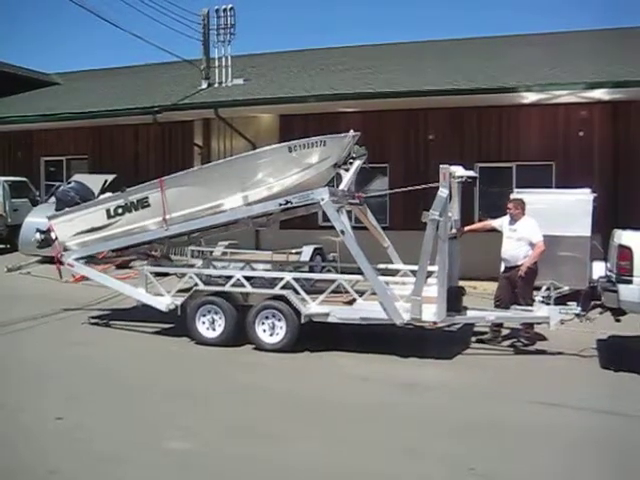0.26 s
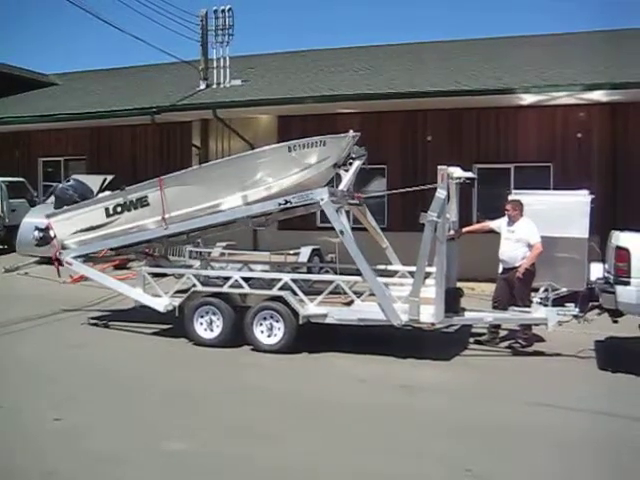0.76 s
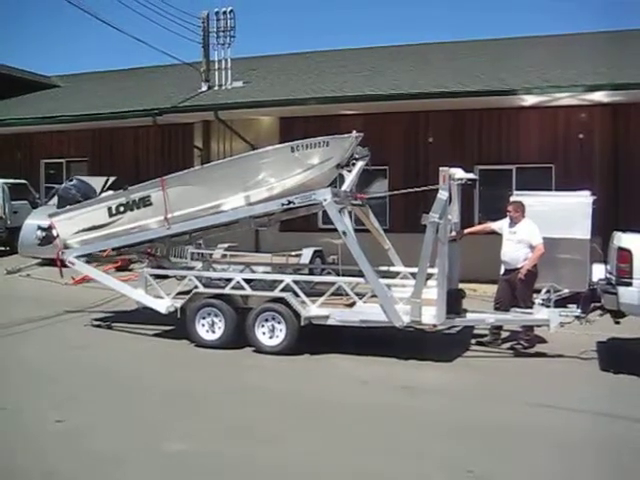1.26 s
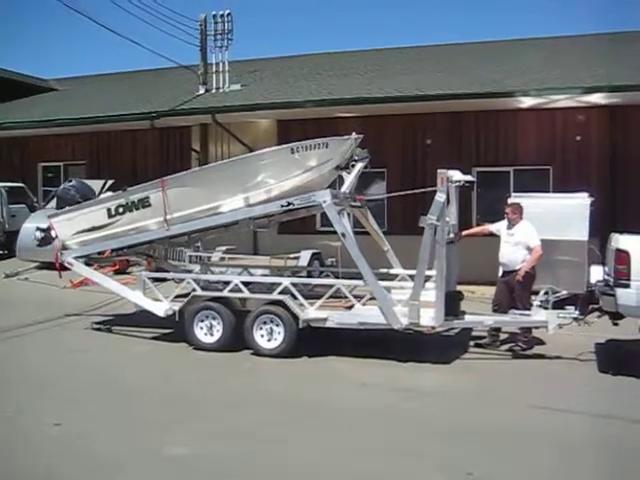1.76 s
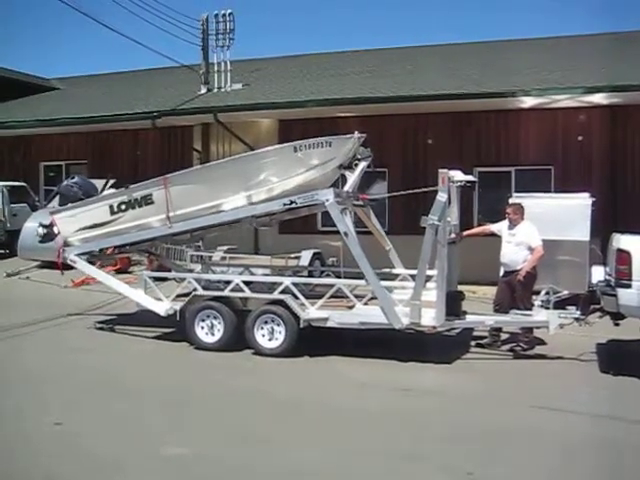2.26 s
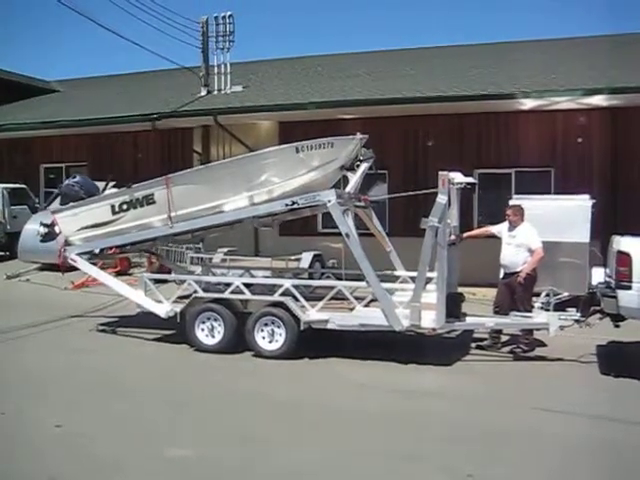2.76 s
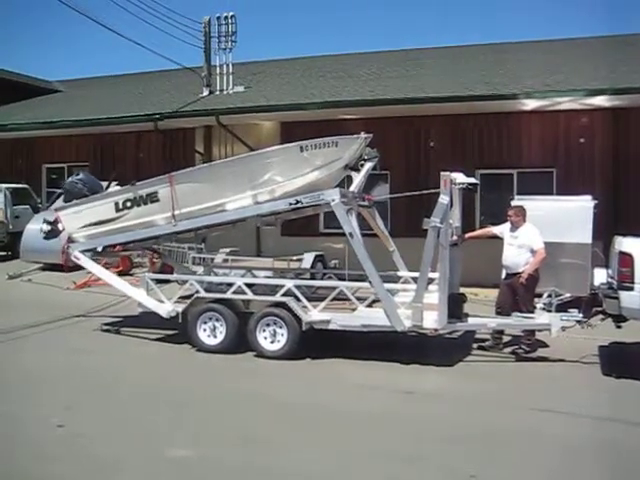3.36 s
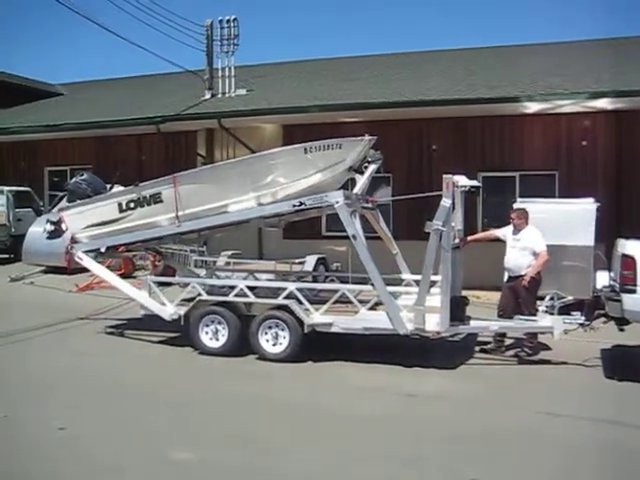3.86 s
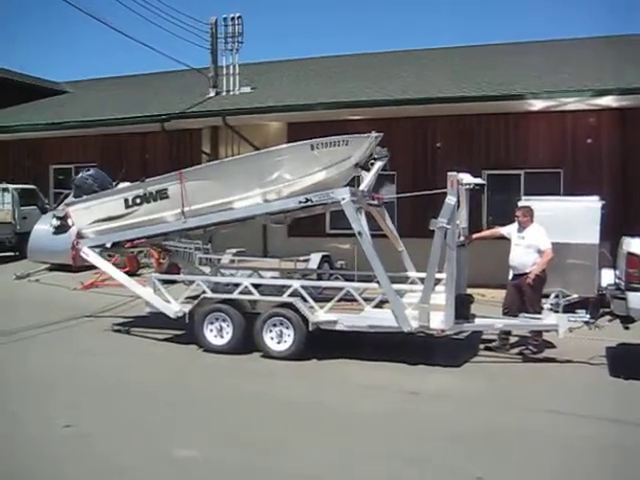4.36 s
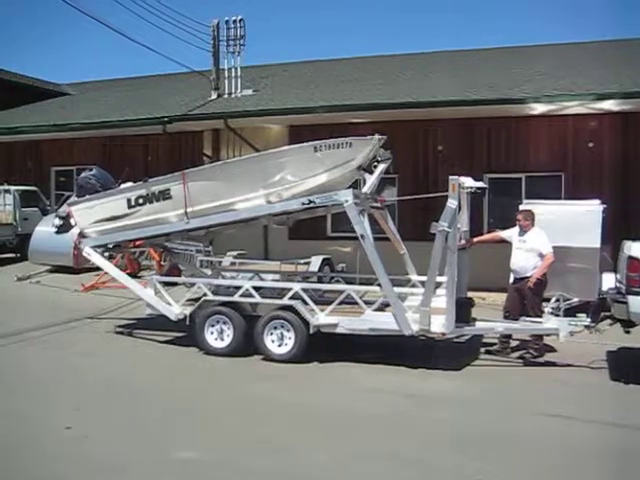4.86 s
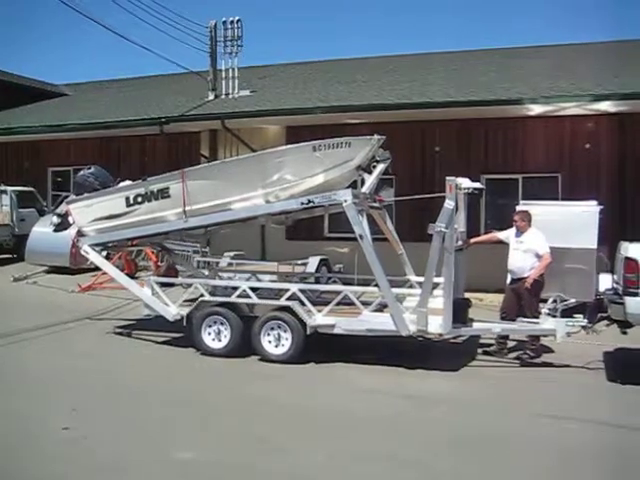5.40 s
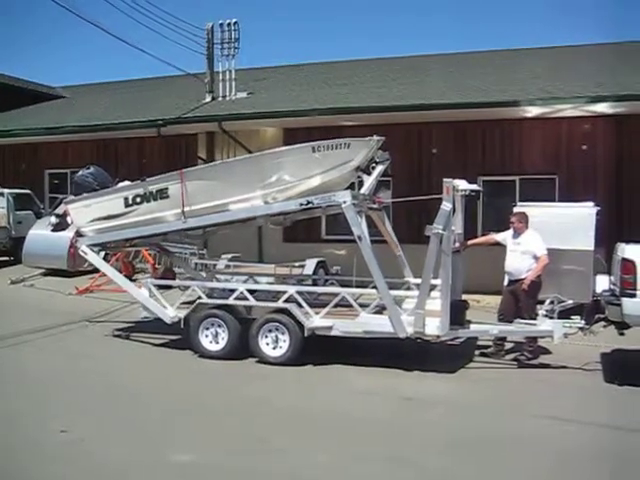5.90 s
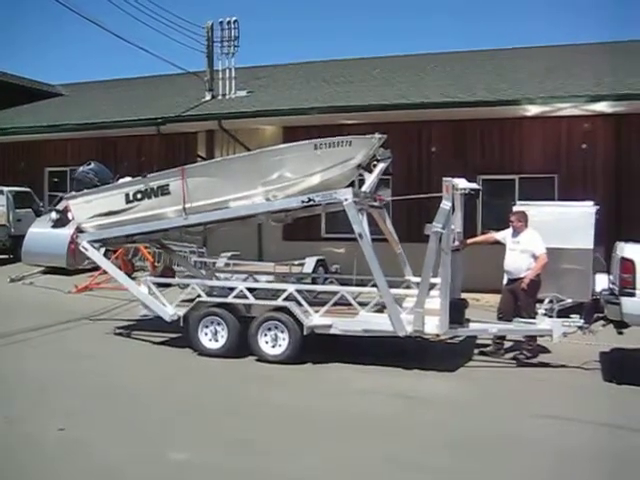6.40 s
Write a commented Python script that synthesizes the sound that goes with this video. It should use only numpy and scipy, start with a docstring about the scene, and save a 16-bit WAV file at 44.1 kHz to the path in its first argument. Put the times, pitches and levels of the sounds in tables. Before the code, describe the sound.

An electric winch whines and rasps steadily as it hauls a boat up a metal trailer outdoors, with a few clacks and a brightening tone.

```python
"""A gear whine with a rasp in it: an electric winch hauling a boat up an aluminium trailer in a paved
yard, some metres from the microphone. Its spur gears rub harder at several tight teeth in each turn of
the big wheel, the rims and frame ring along, and the cable clacks on the drum. As the load eases, near
4 s, the speed rises and the octave of the whine takes over. A far engine, light wind and soft
microphone bumps lie below."""
import sys
import numpy as np
from scipy import signal
from scipy.fft import rfft, irfft
from scipy.io import wavfile
from scipy.ndimage import uniform_filter1d

SR = 44100
rng = np.random.default_rng(int(sys.argv[2]) if len(sys.argv) > 2 else 0)


def to_wav(sig):
    """Store sig (one row per channel, or 1-D mono) as 16-bit WAV at the path in sys.argv[1].

    Samples outside -1..1 are clipped; the rate is SR.
    """
    pcm = np.clip(np.atleast_2d(sig), -1, 1) * 32767
    pcm = np.round(pcm).astype(np.int16)
    wavfile.write(sys.argv[1], SR, pcm.T)  # frames by channels


N = 292824
TIME = np.arange(N) / SR
BINS = np.fft.rfftfreq(N, 1 / SR)

# winch speed, as the rate at which teeth meet: t/s, f/Hz
MESH_RATE = [(0.0, 386.1), (0.55, 385.3), (1.12, 382.1), (1.5, 374.9), (2.15, 384.4), (3.68, 381.8),
             (4.1, 392.8), (4.4, 397.0), (4.75, 394.4), (5.75, 394.3), (6.25, 405.2), (6.64, 408.0)]
# the mesh tone, growing with the haul and dropping back as the load eases: t/s, level/dB
TONE_LEVEL = [(0, -35.5), (3.85, -30.7), (3.92, -38.5), (6.64, -38.5)]
# its octave, which surges as the load eases, sags, then takes over: t/s, level/dB
OCTAVE_LEVEL = [(0, -33.5), (1.1, -31), (1.45, -27.5), (2.1, -32), (3.92, -28), (4.07, -18), (4.15, -27),
                (4.6, -26.5), (5.3, -21), (6.2, -21.5), (6.45, -28.5)]
# tight teeth on the big wheel: place/turns, width/turns, pressure lift/dB
TIGHT_TEETH = [(.98, .035, 3.2), (.075, .03, 2.4), (.175, .025, 1.5), (.3, .02, 1.2), (.405, .032, 3.4),
               (.75, .035, 1.4)]
# the rough upper whine: multiple of the mesh rate, loaded level/dB, eased level/dB, width/Hz
UPPER_PARTIALS = [(3, -42.5, -40.5, 28), (4, -43, -45.5, 27), (5, -36, -37.5, 42), (6, -40.5, -36.5, 120),
                  (9, -41, -42, 50)]
# resonances of the gear train: f/Hz, width/Hz, lift/dB
TRAIN_RESONANCES = [(1140, 6.7, 4.5), (1217, 8.8, 5), (1502, 18, 12), (1994, 18, 14), (2036, 35, 10.5),
                    (2309, 13, 6), (2379, 14, 13), (2404, 16, 10)]
# ring of the gear rims: t/s, f/Hz, level/dB
RIM_TRACK = [(0, 3857, -26), (1.55, 3918, -29), (2.45, 3993, -27), (4.1, 4005, -29.5), (5.1, 4005, -26.5),
             (6.64, 4033, -33.5)]
# modes of the rims: ratio to the pitch of the ring, relative level/dB, width/Hz
RIM_MODES = [(.775, -3.5, 110), (.885, -7.5, 79.5), (1, 2.5, 91.5), (1.094, 1.5, 143)]
# spectrum of the gearbox: f/Hz, relative level/dB
GEARBOX_SPECTRUM = [(170, -26), (260, -21.5), (345, -9.5), (460, -18), (540, -12), (820, 1), (1020, -5.5),
                    (1780, -4), (2080, 0.5), (2480, 1.5), (3100, -2.5), (3700, -3), (4400, -5), (5200, -25)]
# spectrum of the sliding teeth: f/Hz, relative level/dB
SCRAPE_SPECTRUM = [(2500, -12), (4000, -1.5), (4900, 1), (5700, -2.5), (6500, -7), (8000, -11.5),
                   (8800, -10.5), (10200, -16), (12500, -28.5), (15000, -42)]
# resonances and notches of the housing and frame: f/Hz, width/Hz, lift/dB
FRAME_RESONANCES = [(222, 20, 3), (303, 14, 4), (510, 20, 3), (552, 20, 5), (593, 14, 8), (640, 28, -7),
                    (676, 14, 9), (700, 18, 2), (750, 24, 2), (828, 16, 3), (882, 22, 3), (990, 36, -4),
                    (1235, 22, 3), (1503, 36, 6), (1592, 18, 6), (1840, 70, -3), (1918, 26, 4),
                    (2035, 24, 6), (1982, 16, 3), (2114, 18, 4), (2156, 18, 6), (2200, 35, -4),
                    (2312, 22, 4), (2649, 14, 7), (2897, 26, 4), (3042, 70, 3), (3330, 90, -2),
                    (3526, 60, 3), (5605, 90, 6), (7570, 50, 5)]
# firing tone of the far engine: t/s, f/Hz, level/dB
ENGINE_FIRING = [(0, 66.9, -58), (2.3, 66.1, -98), (3.6, 66.6, -57), (5.3, 66.4, -60.5), (5.75, 71.5, -70),
                 (6.15, 76.9, -56), (6.64, 80.1, -55.5)]
# its overtones: multiple of the firing rate, idle level/dB, revved level/dB
ENGINE_OVERTONES = [(2, -60, -62.5), (3, -66.5, -55.5), (6, -73, -53)]
# spectrum of the wind in the yard: f/Hz, relative level/dB
WIND_SPECTRUM = [(15, 1), (40, -8), (100, -0.5), (170, -12), (300, -4), (1000, -37)]
# bumps on the microphone: t/s, level/dB, upper edge f/Hz
MIC_BUMPS = [(.31, -43, 79), (.42, -41, 130), (.52, -46, 100), (3.225, -45, 60), (3.455, -38, 260),
             (3.545, -44, 200), (4.48, -47, 128), (4.98, -45, 131), (5.13, -50, 60), (5.255, -42, 260)]
# clacks of the gears and cable: t/s, level/dB
CABLE_CLACKS = [(0.3643, -30), (0.4893, -20), (0.5352, -22), (1.3994, -20.5), (2.4868, -18), (3.6905, -19),
                (3.7748, -19.5), (4.6654, -21)]

WHEEL_TEETH = 48
EASE_S = (3.85, 3.97)  # the load comes off the cable between these times


def amp(db):
    """Decibels to gain."""
    return 10 ** (np.asarray(db) / 20)


def unit(x):
    """Scales to rms 1."""
    return x / np.sqrt(np.mean(x ** 2) + 1e-20)


def curves(rows):
    """Each column of a timed table, at every sample."""
    s, *columns = np.transpose(rows)
    return [np.interp(TIME, s, c) for c in columns]


def colour(x, points):
    """Filters by a smooth spectrum that rolls off past both ends; rms 1."""
    hz, db = np.transpose(points)
    shape_db = np.interp(np.log(BINS + 1), np.log(hz), db)
    skirts = 1 / np.sqrt((1 + (hz[0] / (BINS + 1)) ** 4) * (1 + (BINS / hz[-1]) ** 8))
    return unit(irfft(rfft(x) * amp(shape_db) * skirts, N))


def wander(hz):
    """Random drift of rms 1, mostly slower than hz."""
    return unit(irfft(rfft(rng.standard_normal(N)) / (1 + (BINS / hz) ** 4), N))


def add(mix, s, sound):
    """Mixes a sound in at time s."""
    part = mix[max(round(s * SR), 0):][:len(sound)]
    part += sound[:len(part)]


def by_load(loaded, eased):
    """A value that moves from loaded to eased as the load comes off."""
    return np.interp(TIME, EASE_S, [loaded, eased])


def lift_db(hz, resonances):
    """How much a set of resonances lifts the frequencies hz."""
    return sum(lift / (1 + (2 * (hz - centre) / width) ** 2) for centre, width, lift in resonances)


def whine(teeth, turns):
    """Mesh tone and its octave; the wheel runs slightly off centre, so they throb once a turn."""
    tone_db, = curves(TONE_LEVEL)
    octave_db, = curves(OCTAVE_LEVEL)
    peak_turns = by_load(0.67, 0.45)
    throb_db = by_load(1.5, 5) * np.cos(2 * np.pi * (turns - peak_turns))
    flicker = unit(amp(1.65 * wander(39)))
    tone = amp(throb_db) * flicker * np.cos(2 * np.pi * teeth + 0.14 * wander(31))
    from_dip = (turns + 0.47) % 1 - .5  # the octave drops out briefly in each turn
    dip_db = by_load(6, 11.5) * np.exp(-.5 * (from_dip / 0.064) ** 2)
    flutter_db = by_load(3, 1.85) * wander(24)
    jitter_rad = by_load(1, 0.35) * wander(14)
    octave = unit(amp(flutter_db - dip_db)) * np.cos(4 * np.pi * teeth + jitter_rad)
    return amp(tone_db) * tone + amp(octave_db) * octave


def tooth_pressure(turns):
    """Pressure in dB about its mean: the tight teeth come round each turn, never twice alike."""
    db = np.zeros(N)
    for place, width, lift in TIGHT_TEETH:
        away = (turns - place + .5) % 1 - .5
        tightness = 1 + .5 * np.tanh(wander(1.7))
        db += lift * tightness * np.exp(-.5 * (away / width) ** 2)
    return db - db.mean()


def smeared_tone(cycles, width_hz):
    """A tone smeared by uneven tooth timing; rms 1."""
    smear = wander(width_hz / 2) + 1j * wander(width_hz / 2)
    smear = smear / np.sqrt(1 + abs(smear) ** 2)  # the phase strays more than the strength
    return unit((smear * np.exp(2j * np.pi * cycles)).real)


def upper_whine(mesh_hz, teeth, turns, press_db, build_s=0.22):
    """Rough mesh overtones, each round a cleaner line that swells while it dwells on a resonance."""
    swing = np.cos(2 * np.pi * (turns - .29))
    line_db = -5 + by_load(-1, 1.5) * swing
    upper = np.zeros(N)
    for multiple, loaded_db, eased_db, width_hz in UPPER_PARTIALS:
        line = np.sqrt(2) * np.cos(2 * np.pi * multiple * teeth + 0.77 * wander(7.1))
        swell_db = uniform_filter1d(lift_db(multiple * mesh_hz, TRAIN_RESONANCES), round(build_s * SR))
        partial = smeared_tone(multiple * teeth, width_hz) + amp(line_db + swell_db) * line
        upper += amp(by_load(loaded_db, eased_db)) * partial
    throb_db = by_load(0.5, 2) * swing
    return upper * unit(amp(0.45 * press_db + throb_db + 2.0 * wander(41)))


def rim_ring(press_db):
    """The gear rims ring in quick metallic bursts as the tight teeth pass; each mode flutters alone."""
    hz, level_db = curves(RIM_TRACK)
    cycles = np.cumsum(hz) / SR
    top_mode_db = by_load(-1.5, 0.5)
    ring = np.zeros(N)
    for ratio, db, width_hz in RIM_MODES:
        flutter_db = 8.3 * np.tanh(wander(85))
        ring += amp(db + top_mode_db * (ratio > 1) + flutter_db) * smeared_tone(ratio * cycles, width_hz)
    return amp(level_db) * unit(ring) * unit(amp(1.96 * press_db))


def friction(teeth, decay_teeth=0.79, slide=1.8, spread_db=0.85, jitter_teeth=0.17):
    """Each tooth lands, a little early or late, with a burst of noise, then slides."""
    landing = np.maximum(teeth + jitter_teeth * wander(90), 0)
    force = amp(spread_db * rng.standard_normal(N)[landing.astype(int)])
    bite = np.exp(-(landing % 1) / decay_teeth)
    return force * (slide + bite) * rng.standard_normal(N)


def rasp(teeth, press_db):
    """Friction rings the gearbox and scrapes in the treble, hardest on the tight teeth."""
    body = colour(friction(teeth) * amp(0.2 * press_db + 0.74 * wander(11)), GEARBOX_SPECTRUM)
    scrape = colour(friction(teeth) * amp(0.74 * press_db + 0.98 * wander(13.5)), SCRAPE_SPECTRUM)
    return amp(by_load(-22, -22.5)) * body + amp(by_load(-34, -33.5)) * scrape


def yard(x, t60_s=0.083, wet_db=-11):
    """The paving and the building front scatter a short tail, 4 ms behind the direct sound."""
    t = np.arange(SR // 2) / SR
    echoes = rng.standard_normal(len(t)) * (rng.random(len(t)) < 2000 / SR)
    tail = echoes * (t > .004) * amp(-60 * t / t60_s)
    return x + amp(wet_db) * signal.fftconvolve(x, tail / np.linalg.norm(tail))[:N]


def frame(x):
    """The housing and frame resonate, swelling or dipping each partial that glides across them."""
    return irfft(rfft(x) * amp(lift_db(BINS, FRAME_RESONANCES)), N)


def far_engine():
    """Firing tone and overtones of an engine a long way off, idling and then revving up."""
    hz, firing_db = curves(ENGINE_FIRING)
    revs = (hz - hz.min()) / np.ptp(hz)
    angle = 2 * np.pi * np.cumsum(hz + .5 * wander(7.9)) / SR
    overtones = sum(amp(idle_db + revs * (revved_db - idle_db)) * np.cos(multiple * angle)
                    for multiple, idle_db, revved_db in ENGINE_OVERTONES)
    return np.sqrt(2) * (amp(firing_db) * np.cos(angle) + overtones)


def wind():
    """Light wind in the yard: low noise that slowly rises and falls."""
    return amp(-54) * colour(rng.standard_normal(N), WIND_SPECTRUM) * amp(2.0 * wander(1.4))


def mic_bumps(rise_s=.016):
    """Soft bumps right on the microphone, each a puff of low noise."""
    age = np.arange(SR // 4) / SR / rise_s
    swell = age * np.exp(1 - age)
    bumps = np.zeros(N)
    for s, db, edge_hz in MIC_BUMPS:
        band = signal.butter(2, [25, edge_hz], "band", fs=SR, output="sos")
        puff = signal.sosfilt(band, rng.standard_normal(len(age)))
        add(bumps, s, amp(db) * unit(puff * swell) * swell.std())
    return bumps


def clacks(rise_s=.005):
    """Short metallic snatches as the cable beds down on the drum."""
    age = np.arange(SR // 10) / SR / rise_s
    hits = np.zeros(N)
    for s, db in CABLE_CLACKS:
        add(hits, s, amp(db) * age * np.exp(1 - age) * rng.standard_normal(len(age)))
    # f/Hz, relative level/dB
    metal = [(700, -18), (2200, -4), (3400, -5), (3950, 2), (4800, -12), (9000, -26), (14000, -52)]
    return hits.std() * colour(hits, metal)


def scene():
    """The yard in mono, some metres from the winch; one gear speed drives whine, rasp and throb."""
    mesh_hz, = curves(MESH_RATE)
    teeth = np.cumsum(mesh_hz) / SR
    turns = teeth / WHEEL_TEETH
    press_db = tooth_pressure(turns)
    ringing = upper_whine(mesh_hz, teeth, turns, press_db) + rim_ring(press_db)
    grinding = yard(rasp(teeth, press_db) + clacks())
    winch = whine(teeth, turns) + frame(ringing + grinding)
    return (winch + far_engine() + wind() + mic_bumps())[None]


def record(dry, edge_hz=15600):
    """The camera behind the microphone adds a thin electronic whistle and limits the band."""
    whistle = amp(-80) * np.sin(2 * np.pi * 15210 * TIME)
    lowpass = signal.firwin(511, edge_hz, window=("kaiser", 9), fs=SR)
    return signal.oaconvolve(dry + whistle, lowpass[None], "same")


dry = scene()
out = record(dry)
to_wav(out)
```